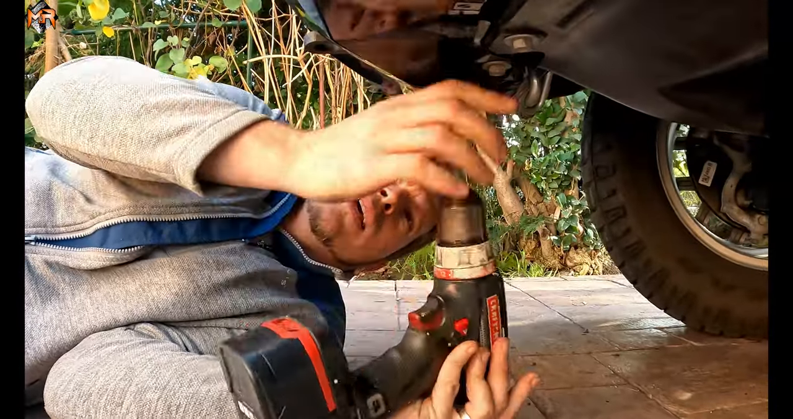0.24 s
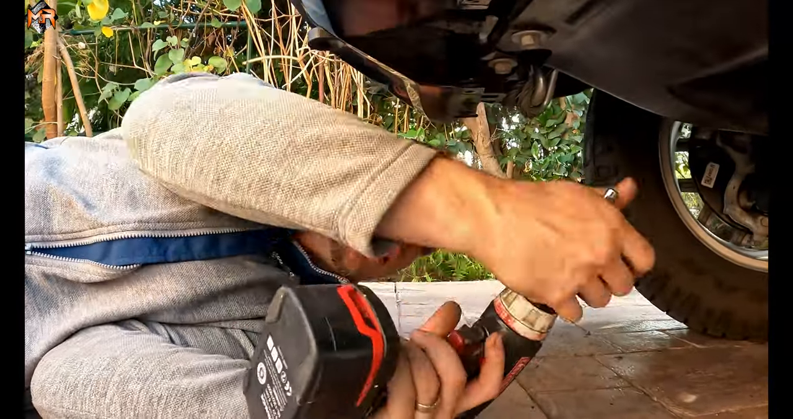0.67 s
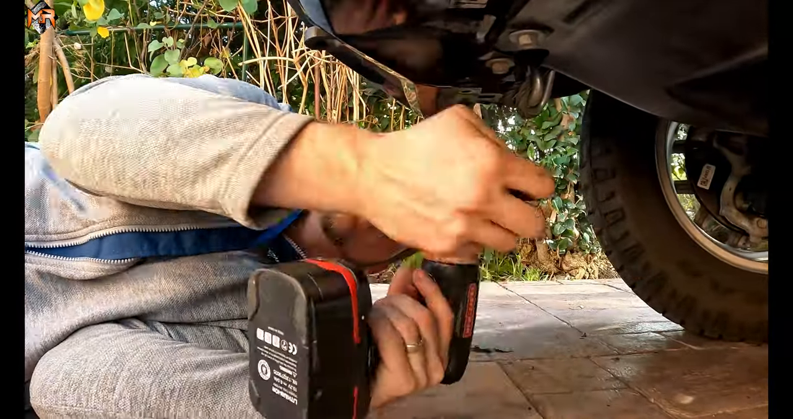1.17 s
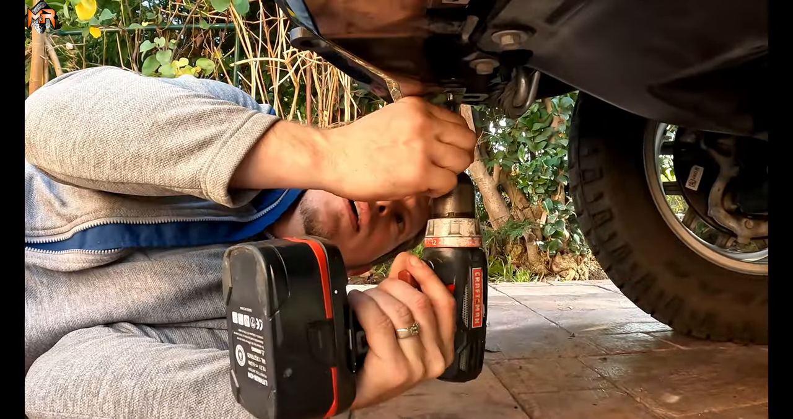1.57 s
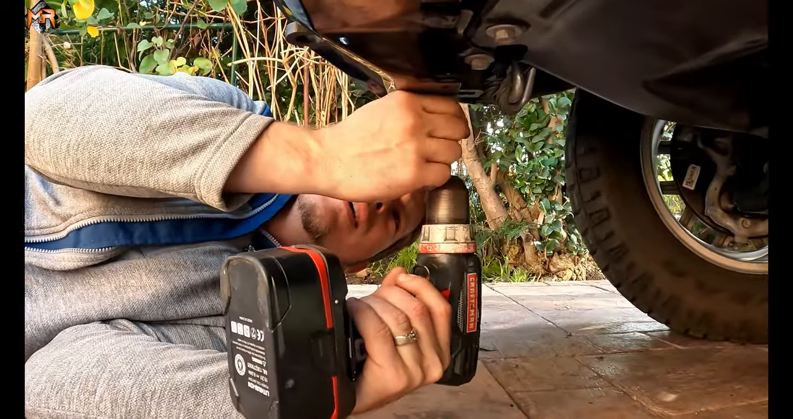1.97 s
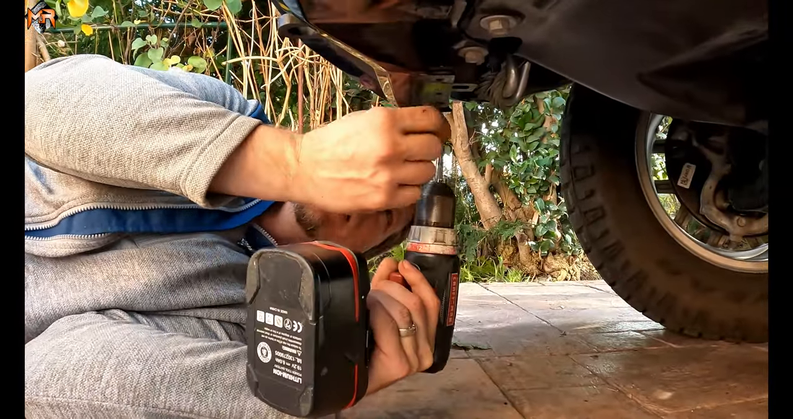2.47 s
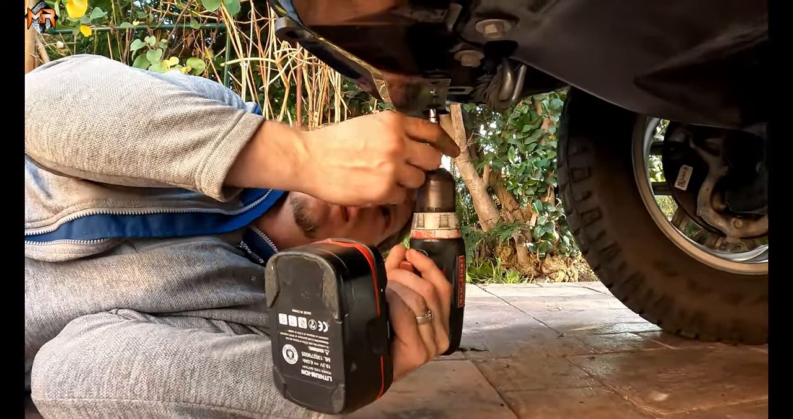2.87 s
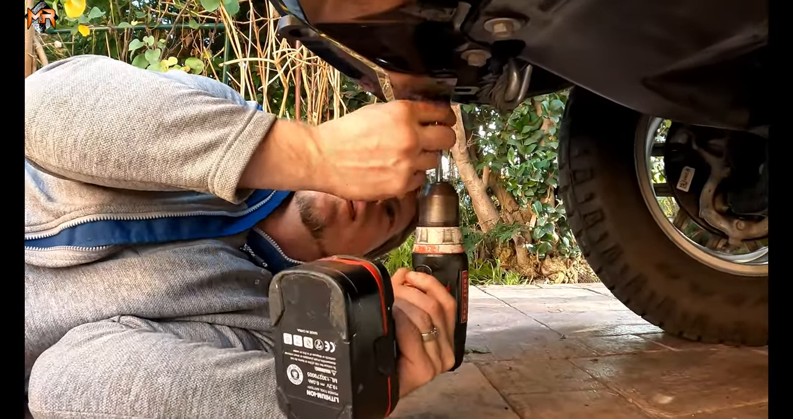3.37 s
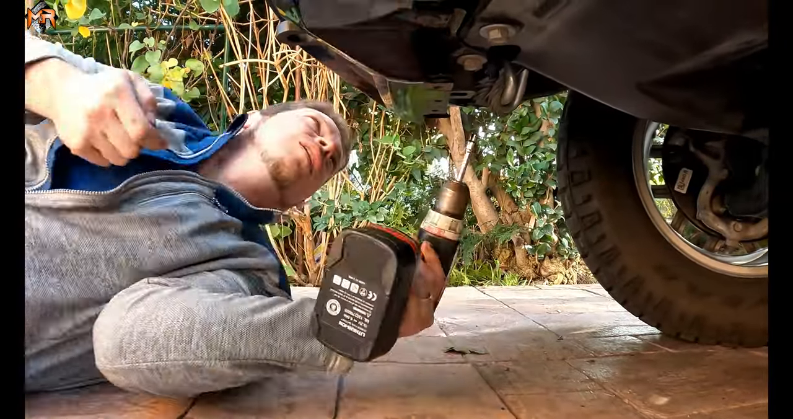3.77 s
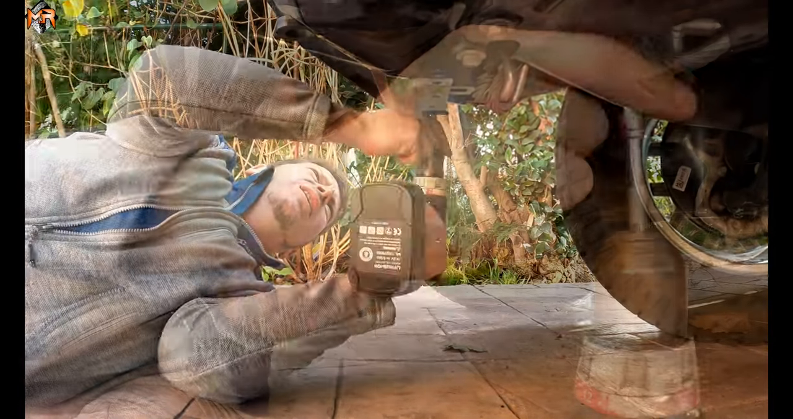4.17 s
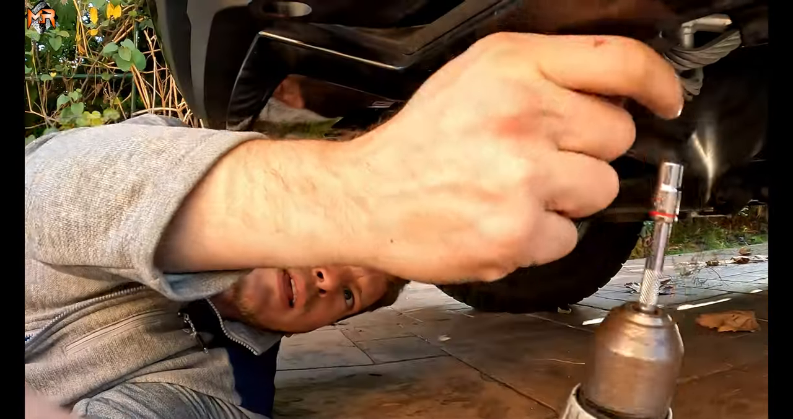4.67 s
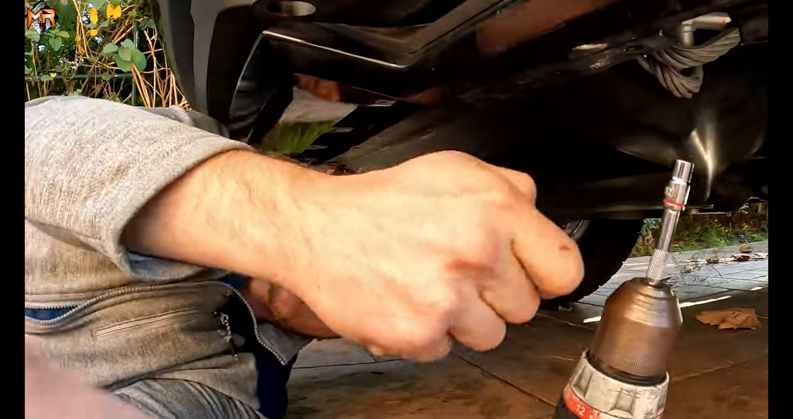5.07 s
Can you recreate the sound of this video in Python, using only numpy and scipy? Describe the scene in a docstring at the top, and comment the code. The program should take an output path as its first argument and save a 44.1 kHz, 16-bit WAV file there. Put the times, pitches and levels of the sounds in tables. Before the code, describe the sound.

Short bursts of whining power drill with gritty socket clicks on bolts, soft thuds and sleeve rustle in quiet outdoor air.

```python
"""A cordless drill spins a socket on an extension in four short bursts under a vehicle: gear-tooth impacts,
brush rub and hiss make its rasp, gear-order tones its whine, and it coasts down after each pull.
The socket clinks and scrapes on the bolts: gritty noise slides through steel resonances, with damped pings.
The mechanic shifts on the paving with low noise, sinking thuds and rustling sleeves, in still outdoor air.
The last burst swells in close by, in a narrower image; twice the sound drops out for an instant."""
import sys
import numpy as np
from scipy import signal
from scipy.fft import rfft, irfft, next_fast_len
from scipy.io import wavfile
from scipy.ndimage import uniform_filter1d, map_coordinates

SR = 44100
rng = np.random.default_rng(int(sys.argv[2]) if len(sys.argv) > 2 else 0)


def int16_out(signal):
    """Quantize to a 16-bit WAV file."""
    q = np.round(np.clip(np.atleast_2d(signal).T, -1, 1) * 32767)
    wavfile.write(sys.argv[1], SR, q.astype(np.int16))


N = 234908

# Still outdoor air: pitch_hz, colour_db
AIR_COLOUR = [(25, -16), (100, -2), (250, -22), (1500, -3.5), (6000, 1), (14000, -4)]
# Likeness of left and right at the microphone: pitch_hz, correlation (-1 to 1)
LEFT_RIGHT_LIKENESS = [(100, -0.31), (300, 0.051), (600, -0.045), (1200, 0.083), (12000, -0.03)]
# Echo decay between paving and vehicle floor: pitch_hz, t60_s
UNDERBODY_DECAY = [(200, 0.21), (2000, 0.036), (10000, 0.012)]
# Instants when the sound drops out: start_s, end_s
DROPOUT_TIMES = [(1.141, 1.173), (4.674, 4.706)]
# Side signal once the drill is close by: pitch_hz, side_gain_db
CLOSE_SIDE_GAIN = [(60, -11), (200, -5.5), (380, -6.5), (700, -12.5), (2400, -8), (15000, -12)]
CLOSE_START_S = 4.01
CLOSE_LEAN_DB = -1  # left minus right, close by
TOP_HZ = 15200  # nothing is kept from here up

# The mechanic shifts his weight: start_s, length_s, level_db (before the low-pass), upper_edge_hz
WEIGHT_SHIFTS = [(0, 0.37, -58, 300), (0.357, 0.87, -55.5, 324), (1.459, 0.48, -61.5, 76.2),
                 (1.962, 0.198, -72, 89), (2.472, 0.12, -68, 198), (2.88, 0.81, -72.5, 250),
                 (3.678, 0.88, -59.5, 252), (4.424, 0.88, -54, 300)]
# Rumble of those shifts: pitch_hz, colour_db
RUMBLE_COLOUR = [(22, -3), (72, 6), (105, -3), (132, 4.5), (190, -7), (270, -19.5), (450, -28),
                 (900, -78.5)]
SHIFT_ATTACK_S, SHIFT_RELEASE_S = 0.011, 0.016
# Sleeve strokes: start_s, length_s, level_db
SLEEVE_STROKES = [(0.302, 0.42, -75), (0.57, 0.09, -64.5), (0.683, 0.42, -77), (1.179, 0.15, -79.5),
                  (1.628, 0.32, -80), (2.582, 0.12, -74), (2.917, 0.1, -71), (3.641, 0.049, -54.5),
                  (3.722, 0.25, -69.5), (3.908, 0.06, -58), (5.17, 0.16, -55)]
# Rustle of the cloth: pitch_hz, colour_db
CLOTH_COLOUR = [(150, -13.5), (300, -13), (520, -6), (760, -14.5), (1050, -4), (1600, -2.5), (2500, -9.5),
                (5200, -10.5), (11900, -27.5), (15000, -50)]
STROKE_ATTACK_S, STROKE_RELEASE_S, CLOTH_REST_DB = 0.013, 0.013, -82
# Soft thuds that sink in pitch: start_s, pitch_hz, level_db (before panning), t60_s, fall_octaves_per_s
SOFT_THUDS = [(2.51, 179, -63, 0.49, 6.3), (3.253, 193, -39.5, 0.18, 9.7), (3.435, 264, -45, 0.14, 0.85),
              (3.656, 152.5, -34.5, 0.3, 4.6), (3.911, 146, -36.5, 0.34, 7.25),
              (5.073, 626, -30, 0.05, 5.5)]

# Socket contacts: time_s, level_db, knock_db and bright_db (both re level; all before the layer trims)
SOCKET_CONTACTS = [(0.071, -40.5, 0, -44), (0.101, -38.5, -2, -15), (0.133, -44, 2.5, -8),
                   (0.158, -36, -8.5, -8), (0.279, -47.5, -20, -6), (0.297, -43.5, -2, -14),
                   (0.315, -48, -22.5, -14), (0.355, -43.5, -7.5, -16.5), (0.399, -43.5, -31, -1.5),
                   (0.462, -54.5, -23, 9), (0.504, -67.5, -10, 8), (0.682, -52, -8, 1.5),
                   (0.756, -58.5, -17, 0), (0.783, -48, -8, -10), (0.946, -59.5, -6, -4),
                   (1.049, -77, 7, 15), (1.649, -55, -1, -2.5), (1.68, -52.5, -0.5, -24),
                   (1.829, -35, -13.5, -32), (2.257, -50, -18, 4.5), (2.418, -53, -37, -7),
                   (2.445, -59, -28, -6), (2.53, -54, -36, -5.5), (2.545, -43, -44, -14.5),
                   (2.744, -48, -20.5, -20), (2.853, -46.5, -26, -6.5), (2.876, -42.5, -8, -42),
                   (2.914, -45, -15, -20), (3.059, -42, -11, -25), (3.49, -38.5, -14, -25),
                   (3.536, -38, -21, -3.5), (3.657, -37.5, -26, -31), (3.907, -42, -10, -21),
                   (4.887, -41, -3, -23), (5.216, -66, 9.5, -5), (5.225, -50, -1, 6)]
# Low, middle and high part of a contact: pitch_hz, colour_db
KNOCK_COLOUR = [(120, -15), (300, 0.5), (450, 11), (700, 4.5), (1000, 12), (1500, -40)]
CLINK_COLOUR = [(700, -62), (1050, 2), (1500, 4), (2300, 5.5), (3600, 1), (4800, -18.5), (7000, -63)]
BRIGHT_COLOUR = [(3000, -10), (4500, 7), (7000, 5), (8500, -2.5), (10500, -4), (13000, -13.5),
                 (15500, -21.5)]
# The wobbling socket strikes the bolt head and rings: start_s, pitch_hz, level_db, t60_s
BOLT_PINGS = [(.070, 2045, -31, 0.034), (.099, 1740, -29, 0.033), (.129, 1213, -25, 0.02),
              (2.545, 2295, -31.5, 0.032), (5.214, 6420, -42, 0.11)]
# The bare socket rings as it leaves the fingers: start_s, level_db, t60_s
BARE_SOCKET_RING = (0.455, -45, 0.27)
BARE_SOCKET_HZ = 13229
SLIDE_RISE_S, SLIDE_FALL_S = 0.0053, 0.0079
TAP_DB, TAP_DECAY_S = -12.5, 0.001  # the hard tap that ends each slide, re the slide's peak

# Steel of the chuck, extension and socket: pitch_hz, width_hz, gain_db
STEEL_RESONANCES = [(1260, 120, -2.5), (2620, 57, -4), (3650, 360, -0.5), (4100, 83, -3.5), (7300, 270, 4),
                    (8060, 2300, -3), (10190, 650, 4), (12050, 310, 7)]
# Rasp of the first burst, the two far ones and the close one: pitch_hz, colour_db
RASP_FIRST_COLOUR = [(530, -27), (900, -9), (1420, 0.5), (1980, -4.5), (2990, 4), (5390, -1.5),
                     (12000, -13.5), (14500, -30), (15000, -56)]
RASP_FAR_COLOUR = [(530, -81), (900, -18), (1050, -21), (1280, -10), (1550, -10), (2510, 1), (3700, 2.5),
                   (4310, -4), (5990, -2), (7230, -7.5), (8940, -17), (10300, -15.5), (12100, -20),
                   (14300, -32), (15000, -58)]
RASP_CLOSE_COLOUR = [(530, -38), (900, -12), (977, -18.5), (1220, -15), (1340, -11.5), (2540, -4.5),
                     (3060, -3), (3570, -4.5), (7150, -11), (8940, -22.5), (12000, -18.5), (15000, -45)]
# Growl of the housing, far and close: pitch_hz, colour_db
GROWL_FAR_COLOUR = [(150, -14), (300, -16.5), (440, -2), (650, -8), (1100, 7), (1500, 2.5), (2200, -43.5)]
GROWL_CLOSE_COLOUR = [(70, -35), (130, -11), (340, 9.5), (520, 9), (750, 1), (1300, 7), (2200, -37)]
# Gear lines: multiple_of_speed, level_db (among the lines)
GEAR_LINES = [(5, -15), (8, -24), (12, 7), (15, -17)]
# Trigger pulls: on_s, off_s, coast_down_s, rasp_db, growl_db, whine_db (re rasp),
# rasp_easing_db_per_s, growl_easing_db_per_s
TRIGGER_PULLS = [(-0.2, 0.085, 0.105, -39.5, -52, -13, 3.5, 1),
                 (1.789, 2.224, 0.085, -36.5, -51, -11.5, 7, 32),
                 (3.035, 3.495, 0.09, -36, -54, -9, 12, 16.5), (3.701, 4.706, 0.16, -34, -45, -5, -0.5, 0)]
# Speed each pull creeps up to: turns_per_s
PULL_TOP_SPEEDS = [258, 248, 252, 253.6]
SPIN_UP_S, BITE_S = 0.06, 0.099  # the motor gains speed; the gears take up the load
CREEP_PER_S = 16  # turns per s gained each second
FRICTION = 8  # dry drag in the coast-down, turns per s
BACKLASH_DB, BACKLASH_S = 1, 0.026  # the teeth chatter when the trigger is let go: peak and its delay
RASP_LAW, GROWL_LAW, WHINE_LAW = 1.23, 0.93, 6  # powers: rasp and growl of the effort, whine of the speed
WHINE_FREE_DB = -4  # extra whine gain once the trigger is let go
CASE_DB, CASE_HZ, CASE_WIDTH_HZ = 17.5, 430, 118  # the hollow handle's resonance
SWELL_START_S, SWELL_S = 3.962, 0.68  # the last burst fades in
SWELL_GROWL, SWELL_WHINE = 0.58, 0.89  # growl and whine lag the fade by these extra powers


def amp(db):
    """Decibels to gain."""
    return 10 ** (np.asarray(db) / 20)


def unit(x):
    """Scale to rms 1."""
    return x / np.sqrt(np.mean(x ** 2) + 1e-20)


def along(points, hz):
    """Read (pitch_hz, value) points on a log pitch axis."""
    f, v = np.transpose(points)
    return np.interp(np.log(hz + 1), np.log(f + 1), v)


def clock():
    """The time of each sample, in seconds."""
    return np.arange(N) / SR


def wobble(rate):
    """A smooth random curve, rate knots a second."""
    knots = rng.standard_normal(int(N * rate / SR) + 4)
    return map_coordinates(knots, [np.arange(N) * rate / SR])


def noise():
    """Two unrelated white noises."""
    return rng.standard_normal((2, N))


def filtered(x, response):
    """Multiply the spectrum of x by a response of frequency."""
    size = next_fast_len(N + 4096, real=True)
    spectrum = rfft(x, size) * response(np.fft.rfftfreq(size, 1 / SR))
    return irfft(spectrum, size)[..., :N]


def steel(hz, ripple_db=1.9, spacing_hz=55):
    """Gain of the tool's steel: broad resonances with many close modes on top."""
    broad = sum(db / (1 + (2 * (hz - centre) / width) ** 2) for centre, width, db in STEEL_RESONANCES)
    fine = map_coordinates(rng.standard_normal(size=1024), [hz / spacing_hz], mode="mirror")
    return amp(broad + ripple_db * np.minimum(fine, 1.5))


def stereo(pair, colour, metal=False):
    """Two unrelated signals become a coloured, partly alike left and right whose mid has rms 1."""
    def response(hz):
        turn = np.arccos(np.clip(along(LEFT_RIGHT_LIKENESS, hz), -1, 1)) / 2
        body = steel(hz) if metal else 1
        return amp(along(colour, hz)) * body * np.array([np.cos(turn), np.sin(turn)])
    mid, side = filtered(pair, response)
    return np.array([mid + side, mid - side]) / np.sqrt(np.mean(mid ** 2) + 1e-20)


def patchy(x, patchy_db, size=1024):
    """Hands, tool and cloth shift, so narrow bands of the sound come and go."""
    z = signal.stft(x, nperseg=size)[2]
    field = rng.standard_normal(z.shape[1:])
    field = uniform_filter1d(field, size=3, axis=0)  # over neighbouring bands
    field = uniform_filter1d(field, size=9, axis=1)  # over time
    gain = unit(amp(patchy_db * np.minimum(unit(field), 1.5)))
    return signal.istft(z * gain, nperseg=size)[1][:, :N]


def gesture(s, length, db, attack, release):
    """A level that rises, holds and dies away."""
    age = clock() - s
    return amp(db) * np.clip(age / attack, 0, 1) * np.exp(-np.maximum(age - length, 0) / release)


def ring(s, hz, db, t60, fall, attack):
    """A damped tone whose pitch may sink, by fall octaves per s."""
    age = np.maximum(clock() - s, 0)
    phase = 2 * np.pi * np.cumsum(hz * 2 ** (-fall * age) * (age > 0)) / SR
    return amp(db - 60 * age / t60) * (1 - np.exp(-age / attack)) * np.sin(phase)


def outdoor_air():
    """Still air: faint steady coloured noise."""
    return amp(-85.5) * stereo(noise(), AIR_COLOUR)


def underbody(x):
    """Short echoes between the paving and the vehicle's floor: a noise tail that decays by band."""
    hz, t, z = signal.stft(rng.standard_normal((2, SR // 4)), SR, nperseg=256)
    decay = amp(-60 * t / along(UNDERBODY_DECAY, hz)[:, None])
    tail = signal.istft(z * decay, SR, nperseg=256)[1]
    return signal.fftconvolve(x, tail / np.linalg.norm(tail[0]), axes=1)[:, :N]


def weight_shifts():
    """Shifting weight rumbles: uneven low noise, low-passed afresh for each shift."""
    ground = amp(2.25 * wobble(16)) * stereo(noise(), RUMBLE_COLOUR)
    rumble = np.zeros((2, N))
    for s, length, db, edge_hz in WEIGHT_SHIFTS:
        low_pass = signal.butter(2, edge_hz, fs=SR, output="sos")
        level = gesture(s, length, db, SHIFT_ATTACK_S, SHIFT_RELEASE_S)
        rumble += level * signal.sosfilt(low_pass, ground)
    return rumble


def sleeves():
    """Rubbing cloth: rough, patchy noise follows the strokes over a faint resting level."""
    strokes = sum(gesture(*row, STROKE_ATTACK_S, STROKE_RELEASE_S) for row in SLEEVE_STROKES)
    rubbing = strokes + amp(CLOTH_REST_DB)
    cloth = stereo(noise() * amp(1.75 * wobble(490)), CLOTH_COLOUR)
    return patchy(rubbing * amp(1.6 * wobble(44)) * cloth, patchy_db=5)


def thuds():
    """Soft thuds: damped tones sink in pitch, unsteady and stronger on the right."""
    tones = sum(ring(*row, attack=0.0081) for row in SOFT_THUDS)
    unsteady = 1 + 0.89 * np.array([wobble(110), wobble(110)])
    return tones * unsteady * amp([[-8], [3.5]])


def mechanic():
    """Shifting weight rumbles and thuds; sleeves rustle."""
    return weight_shifts() + sleeves() + thuds()


def contact_levels():
    """Levels of knock, clink and bright: each contact is a slide that swells to a tap and dies away."""
    t = clock()
    levels = np.zeros((3, N))
    for s, db, knock_db, bright_db in SOCKET_CONTACTS:
        near = slice(max(0, int((s - .1) * SR)), int((s + .2) * SR))
        age = t[near] - s
        slide = np.exp(np.minimum(age / SLIDE_RISE_S, -age / SLIDE_FALL_S))
        tap = amp(TAP_DB) * (age > 0) * np.exp(-np.abs(age) / TAP_DECAY_S)
        levels[:, near] += amp([[db + knock_db], [db], [db + bright_db]]) * (slide + tap)
    return levels


def socket():
    """The socket on the bolts: gritty contacts excite its steel, and free steel rings as damped tones."""
    levels = contact_levels()
    grit = unit(patchy(noise(), patchy_db=4.0) * amp(0.72 * wobble(900)))
    knock = amp(-2.5) * levels[0] * stereo(grit, KNOCK_COLOUR, metal=True)
    clink = amp(-0.7) * levels[1] * stereo(grit, CLINK_COLOUR, metal=True)
    bright = amp(0.8) * levels[2] * stereo(grit, BRIGHT_COLOUR, metal=True)
    pings = sum(ring(s, hz, db, t60, fall=0, attack=0.00096) for s, hz, db, t60 in BOLT_PINGS)
    s, db, t60 = BARE_SOCKET_RING
    shimmer = 1 + 1.2 * np.array([wobble(70), wobble(71.4)])
    bare_ring = ring(s, BARE_SOCKET_HZ, db, t60, fall=0, attack=0.002) * shimmer
    return knock + clink + bright + pings + bare_ring


def motor(on, off, top, coast):
    """Turns per second: spins up, creeps to its top speed as the bolt frees, then coasts to a stop."""
    t = clock()
    spin_up = 1 - np.exp(-np.maximum(t - on, 0) / SPIN_UP_S)
    driven = spin_up * (top - CREEP_PER_S * np.maximum(off - t, 0))
    return np.maximum((driven + FRICTION) * np.exp(-np.maximum(t - off, 0) / coast) - FRICTION, 0)


def tooth_strikes(turns, worn, scatter_db, count=12):
    """One impact per gear tooth: partly the same pattern every turn, partly chance."""
    at = np.flatnonzero(np.diff(np.floor(turns * count)))
    pattern = rng.uniform(-1, 1, (2, count))[:, np.arange(len(at)) % count]
    impacts = np.tanh(worn * pattern + rng.standard_normal((2, len(at))))
    strikes = np.zeros((2, N))
    strikes[:, at] = impacts * amp(scatter_db * rng.standard_normal(len(at)))
    return unit(strikes)


def rasp(turns, strikes_db, cyclic_db, throb, size=170):
    """Tooth impacts, brushes rubbing over the same track each turn, and sliding hiss."""
    track = unit(irfft(np.exp(2j * np.pi * rng.random((2, size // 2 + 1)))))
    place = [turns * size % size]
    brushes = np.array([map_coordinates(side, place, mode="grid-wrap") for side in track])
    hiss = noise() * (1 + throb * np.sin(2 * np.pi * turns))
    return hiss + amp(cyclic_db) * brushes + amp(strikes_db) * tooth_strikes(turns, worn=0.2, scatter_db=2)


def whine(speed, turns, flutter_db, blur):
    """Gear lines at multiples of the speed, and their boom near the handle's resonance."""
    lines, boom = np.zeros((2, N)), np.zeros(N)
    for order, db in GEAR_LINES:
        phase = 2 * np.pi * order * turns + blur * wobble(41) + np.array([[0], [1]])  # sides differ in phase
        line = amp(flutter_db * wobble(25)) * np.sin(phase)
        lines += amp(db) * line
        resonance = 1 / (1 + (2 * (order * speed - CASE_HZ) / CASE_WIDTH_HZ) ** 2)
        boom += amp(CASE_DB + db * 0.24) * line[0] * resonance
    return lines, boom


def burst(pull, top, speed, place, drive, tones, boom):
    """One trigger pull rattles the steel and the housing: the faster, the louder."""
    t = clock()
    on, off, coast, rasp_db, growl_db, whine_db, rasp_easing_db, growl_easing_db = pull
    rasp_colour, growl_colour, fade = place
    held, freed = np.clip(t - on, 0, off - on), np.maximum(t - off, 0)
    effort = np.where(t < off, np.minimum(held / BITE_S, 1), speed / top)
    backlash_db = BACKLASH_DB * freed / BACKLASH_S * np.exp(1 - freed / BACKLASH_S)
    whine_gain = amp(whine_db + WHINE_FREE_DB * (t > off)) * (speed / top) ** WHINE_LAW
    singing = whine_gain * fade ** SWELL_WHINE * tones
    rasp_gain = amp(rasp_db + backlash_db - rasp_easing_db * held) * effort ** RASP_LAW
    gears = rasp_gain * (stereo(drive, rasp_colour, metal=True) + singing)
    # the loose extension shakes the housing unevenly
    shake = amp(4.3 * wobble(50)) * stereo(drive + 0.94 * noise(), growl_colour)
    growl_gain = amp(growl_db - growl_easing_db * held) * effort ** GROWL_LAW * fade ** SWELL_GROWL
    housing = growl_gain * (shake + boom * (t > off))  # it booms only while coasting
    return fade * (gears + housing)


def drill():
    """Each pull of the trigger spins up the gearbox, heard from its own place."""
    speeds = [motor(on, off, top, coast)
              for (on, off, coast, *_), top in zip(TRIGGER_PULLS, PULL_TOP_SPEEDS)]
    total = np.maximum(np.max(speeds, axis=0), 5)
    turns = np.cumsum(total) / SR
    drive = patchy(rasp(turns, strikes_db=-8, cyclic_db=-10.5, throb=0.16), patchy_db=3.5)
    tones, boom = whine(total, turns, flutter_db=1.8, blur=.15)
    swell = np.clip((clock() - SWELL_START_S) / SWELL_S, 0, 1)
    # heard from: rasp colour, growl colour, fade
    first = (RASP_FIRST_COLOUR, GROWL_CLOSE_COLOUR, 1)
    far = (RASP_FAR_COLOUR, GROWL_FAR_COLOUR, 1)
    close = (RASP_CLOSE_COLOUR, GROWL_CLOSE_COLOUR, swell)
    pulls = zip(TRIGGER_PULLS, PULL_TOP_SPEEDS, speeds, [first, far, far, close])
    return sum(burst(*pull, drive, tones, boom) for pull in pulls)


def scene():
    """Still air, mechanic, echoes and tool; the image narrows for the close burst."""
    tool = drill() + socket()
    left, right = outdoor_air() + mechanic() + amp(-10.5) * underbody(tool) + tool
    mid, side = (left + right) / 2, (left - right) / 2
    close = uniform_filter1d(1.0 * (clock() > CLOSE_START_S), size=1000)
    narrow = filtered(side, lambda hz: amp(along(CLOSE_SIDE_GAIN, hz)))
    side = (1 - close) * side + close * narrow
    lean = amp(close * CLOSE_LEAN_DB * np.array([[.5], [-.5]]))
    return np.array([mid + side, mid - side]) * lean


def record(dry):
    """The sound drops out twice, and nothing is kept above the band limit."""
    silent = sum((clock() > start) & (clock() < end) for start, end in DROPOUT_TIMES)
    gain = uniform_filter1d(amp(-42.0 * silent), size=80)
    return filtered(dry * gain, lambda hz: hz < TOP_HZ)


dry = scene()
out = record(dry)
int16_out(out)
```